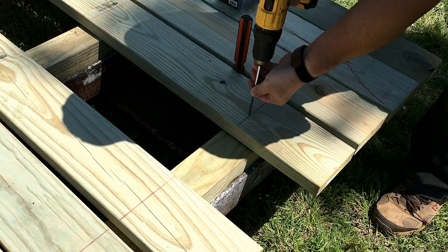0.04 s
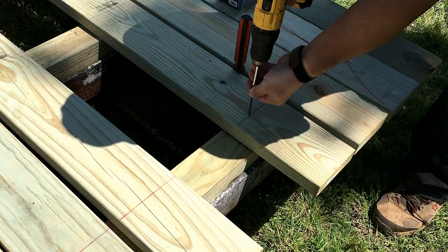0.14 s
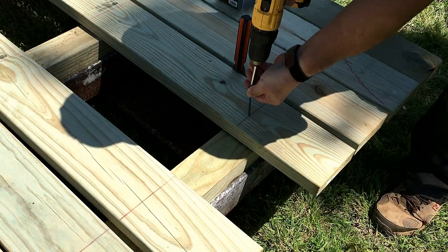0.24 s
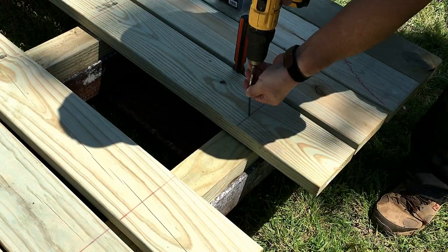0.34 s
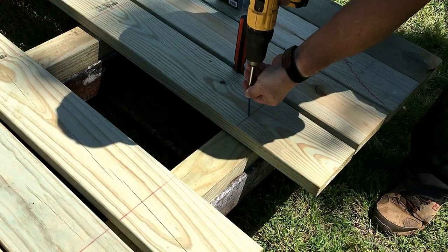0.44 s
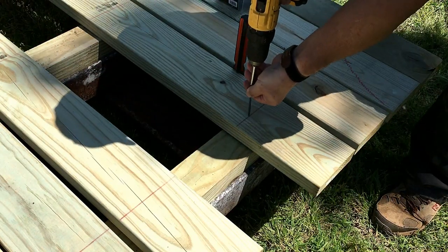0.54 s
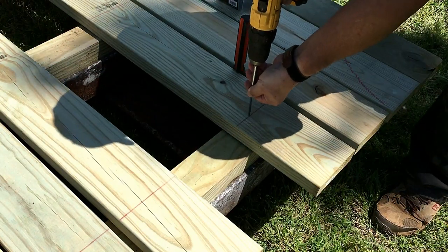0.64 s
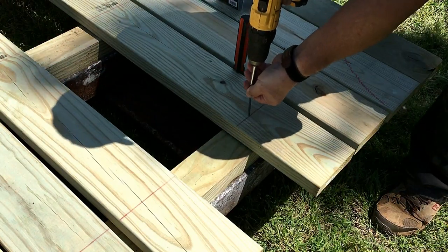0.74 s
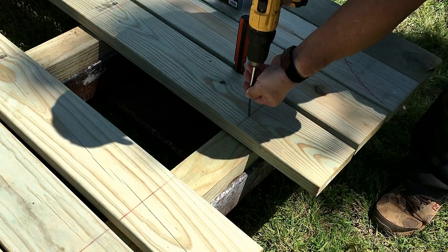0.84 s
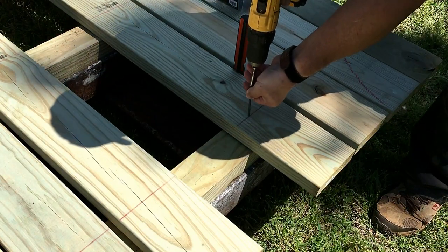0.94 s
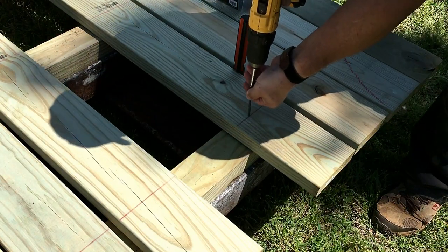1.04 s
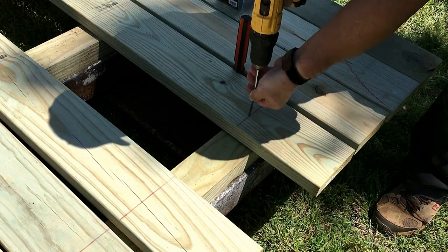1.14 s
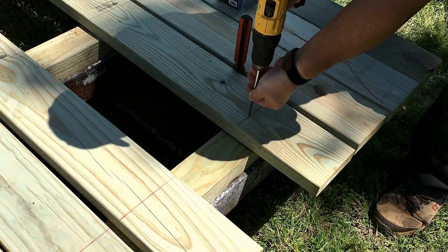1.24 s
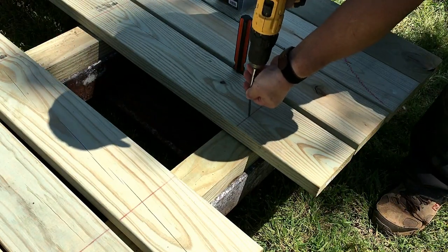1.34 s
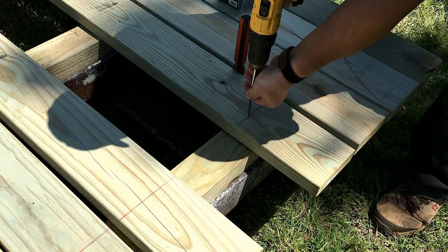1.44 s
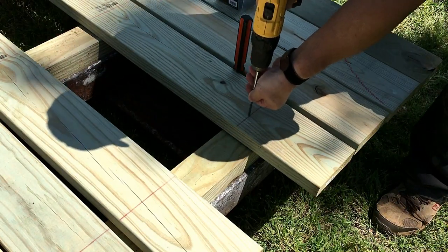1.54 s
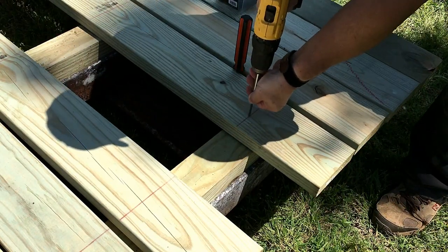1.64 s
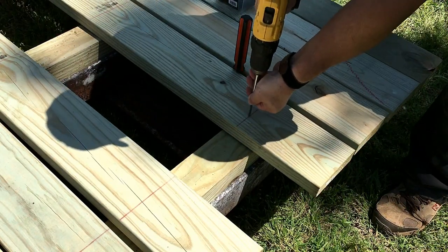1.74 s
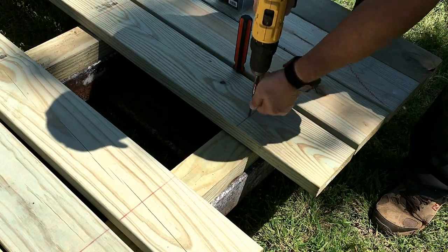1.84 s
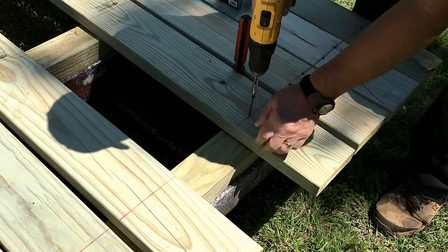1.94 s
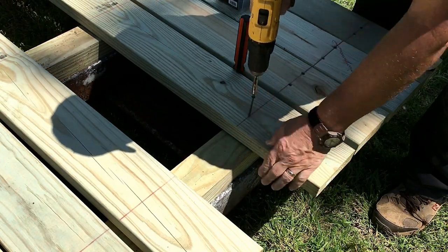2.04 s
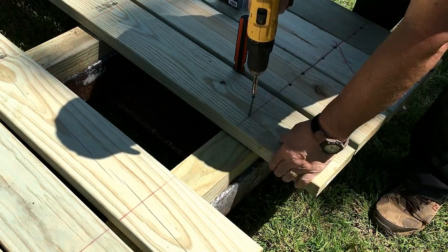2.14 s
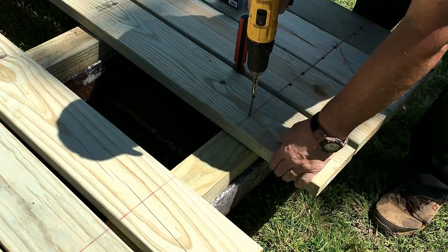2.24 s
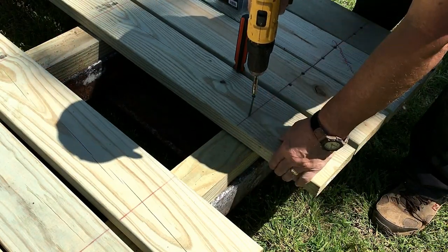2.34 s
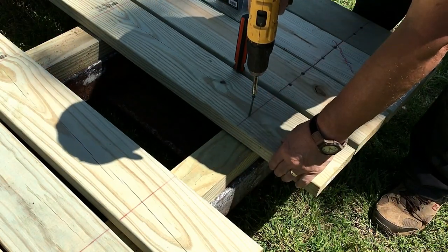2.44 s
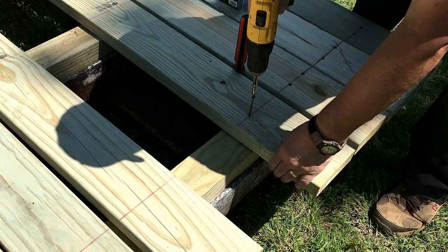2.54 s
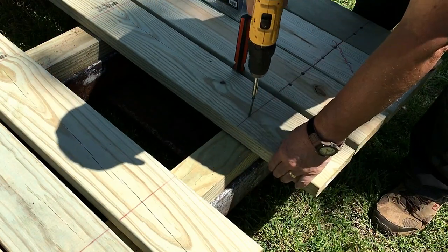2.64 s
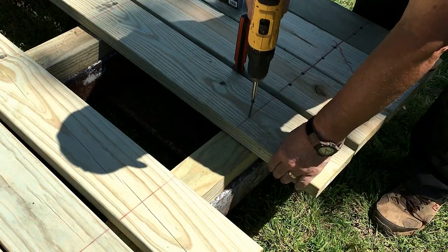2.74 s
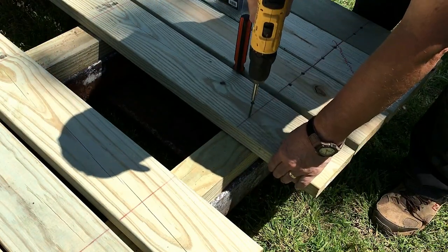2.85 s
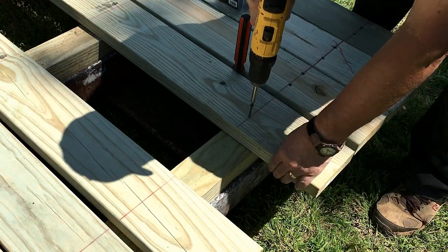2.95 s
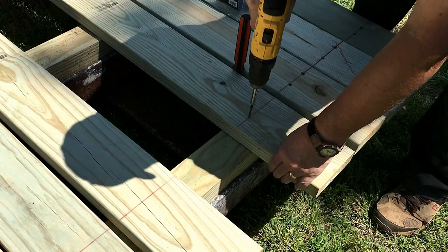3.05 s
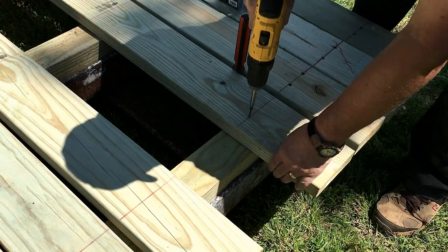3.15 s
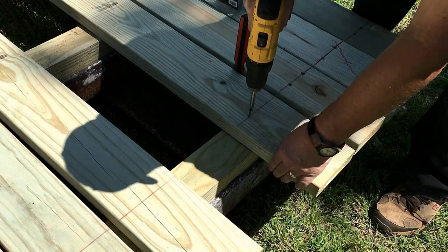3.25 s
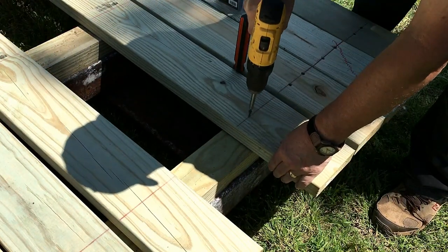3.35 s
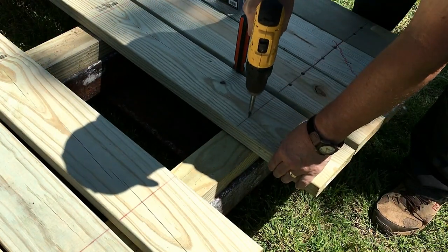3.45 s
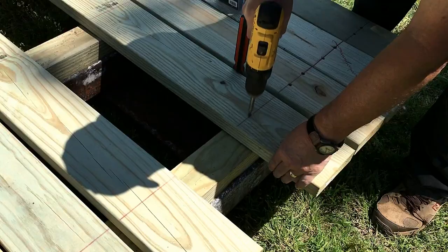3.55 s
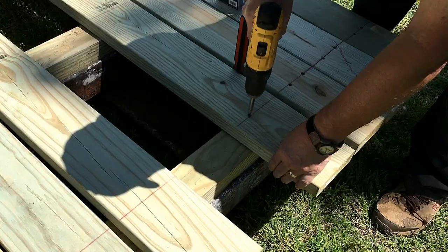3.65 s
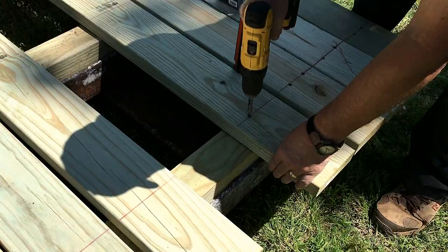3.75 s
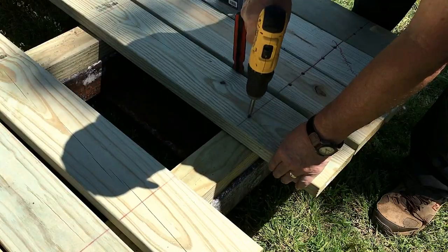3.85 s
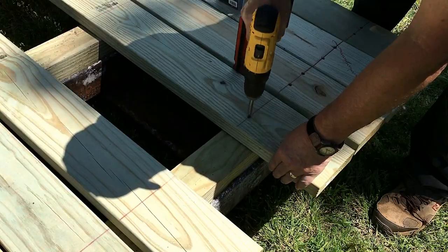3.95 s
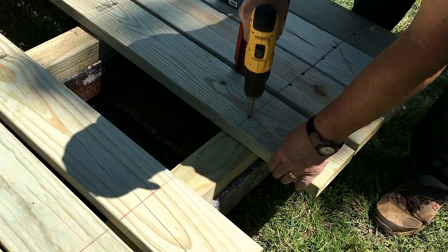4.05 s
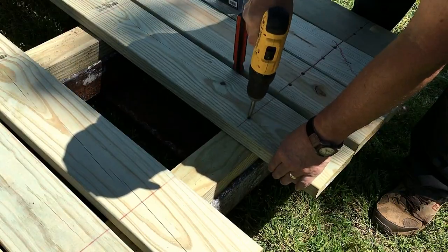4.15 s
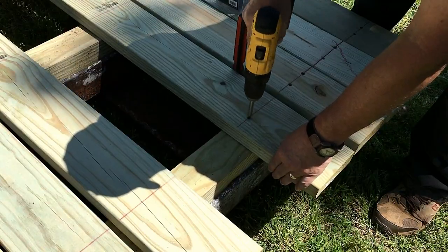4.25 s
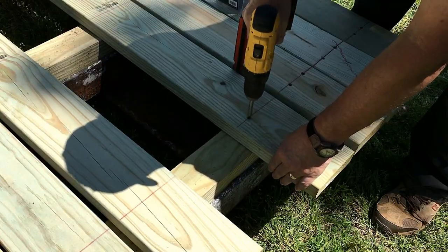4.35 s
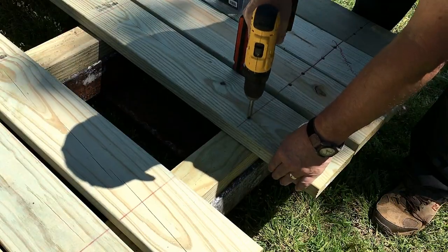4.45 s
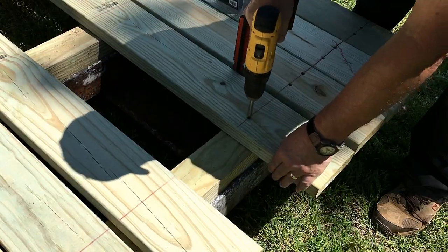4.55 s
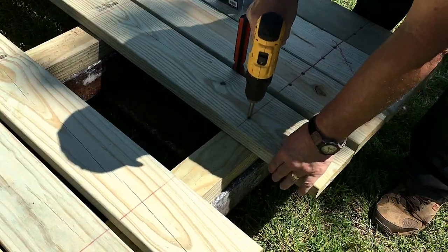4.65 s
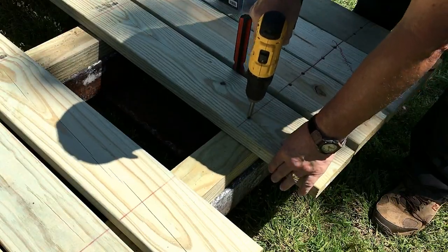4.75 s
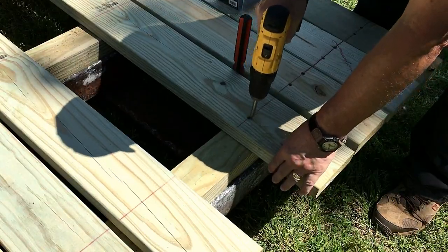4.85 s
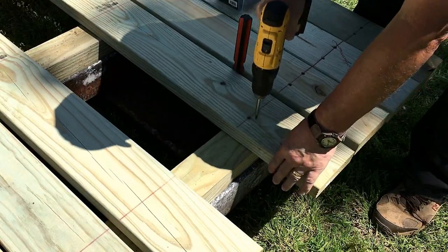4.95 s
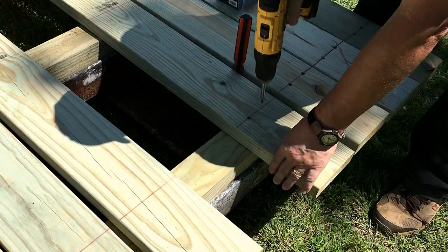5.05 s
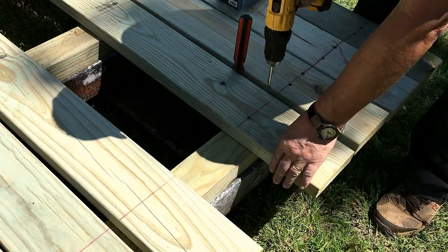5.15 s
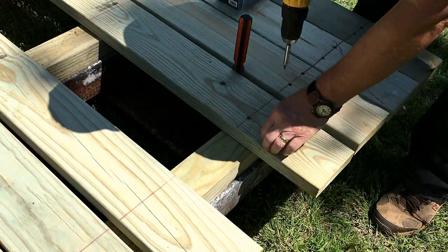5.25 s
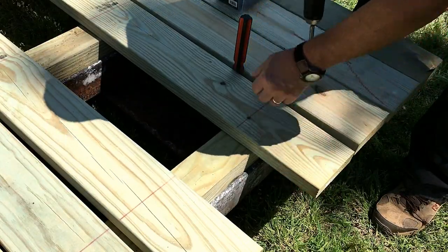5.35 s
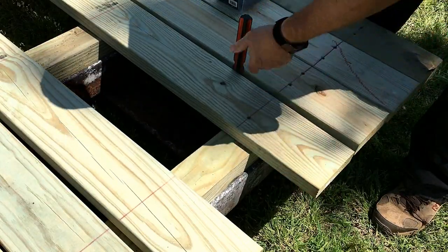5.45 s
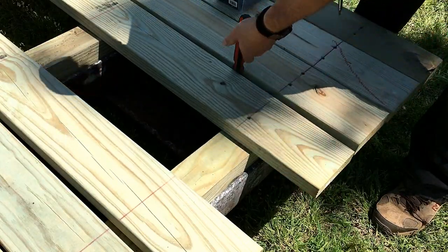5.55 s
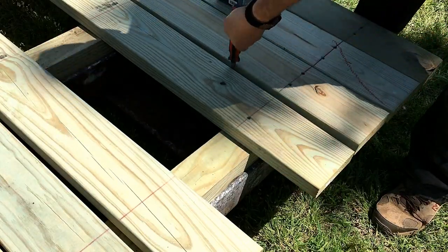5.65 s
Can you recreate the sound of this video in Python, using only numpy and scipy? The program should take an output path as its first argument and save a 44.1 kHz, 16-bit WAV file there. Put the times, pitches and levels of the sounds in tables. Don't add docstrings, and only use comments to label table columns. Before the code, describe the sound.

Close outdoors, a cordless drill starts with a thin electronic buzz and a slowly rising whine, then drops into a rough growl as the screw bites. After a pause and a light knock comes a faster, louder, harsher run, then two very short bursts among wooden knocks. A last clack follows. Faint birds and soft distant engine wash lie behind. One near microphone, almost no echo.

```python
import sys
import numpy as np
from scipy import signal
from scipy.fft import rfft, irfft, next_fast_len
from scipy.io import wavfile
from scipy.ndimage import uniform_filter1d

SR = 44100
rng = np.random.default_rng(int(sys.argv[2]) if len(sys.argv) > 2 else 0)


def invert_db(level):
    return 10 ** (np.asarray(level, dtype=float) / 20)


def generate_wav(sig):
    pcm = np.round(np.clip(np.atleast_2d(sig).T, -1, 1) * 32767).astype(np.int16)
    wavfile.write(sys.argv[1], SR, pcm)


N = 251323
TIME = np.arange(N) / SR


def evened(x):
    return x / np.sqrt(np.mean(x ** 2) + 1e-20)


def read(points, hz):
    f, value = np.transpose(points)
    return np.interp(np.log(hz + 1), np.log(f + 1), value)


def add(mix, start_s, sound):
    part = mix[round(start_s * SR):][:len(sound)]
    part += sound[:len(part)]


def shaped(x, gain):
    size = next_fast_len(len(x) + 4096)
    return irfft(rfft(x, size) * gain(np.fft.rfftfreq(size, 1 / SR)), size)[:len(x)]


def wander(size, hz):
    return evened(shaped(rng.standard_normal(size), lambda f: 1 / (1 + (f / hz) ** 4)))


# start_s, load (0 free to 1 full)
LOAD = [
    (1.5, 0),
    (1.62, .7),
    (1.9, .7),
    (2.7, 1),
]
# time_s, whine_hz (12 times the shaft speed)
SPEED = [
    [(.19, 2270), (.66, 2470), (.888, 2529), (1.086, 2612), (1.33, 2738), (1.47, 2782), (1.575, 2706),
     (1.73, 2257), (1.89, 1870)],
    [(2.67, 3900), (2.84, 3905), (2.94, 3806), (3.02, 3700), (3.1, 3614), (3.18, 3567), (3.28, 3559),
     (3.41, 3443), (3.655, 3290)],
    [(3.822, 1500), (3.84, 1960), (3.859, 2720), (3.869, 2900), (3.89, 2900), (3.941, 2710)],
    [(4.103, 2700), (4.2, 2700), (4.216, 2620)],
]
# speed at the pull_hz, spin_up_s, brake_s
MOTOR = [
    (930, .11, .08),
    (20, .05, .085),
    (900, .026, .047),
    (800, .055, .04),
]
# hiss_db, orders_db, whine_db
TONE = [
    (2, -1.5, 2.5),
    (-0.5, 3.5, 0.5),
    (-5, 4.5, 0),
    (-6, 5, -0.5),
]
# time_s, motor_level_db, push of the hand on the board_db
EFFORT = [
    [(.19, -45, -0.5), (.42, -44, 2), (1.08, -42.5, 4), (1.27, -41.5, 1), (1.53, -40.5, 2), (1.6, -39, 3),
     (1.89, -41, 2)],
    [(2.67, -36, 9), (2.8, -32.5, 2.5), (3.04, -32.5, 4), (3.2, -33, 1.5), (3.655, -32.5, 0.5)],
    [(3.815, -30, 0), (3.932, -30, -3.5)],
    [(4.095, -28, 5.5), (4.207, -29.5, -4)],
]
FADE_S = [0.076, 0.086, 0.061, .051]
SPIN_DB = [37, 10.5, 17.5]
BRAKE_DB = [-36, -45, -96]


def trigger_pull(load, speed, motor, tone, effort, fade_s):
    stall_hz, surge_db = 500, 4
    engage_db, engage_s = -6.5, 0.014
    brake_curve = 2.8
    on, off = speed[0][0], speed[-1][0]
    start_hz, spin_s, brake_s = motor
    hiss_db, orders_db, whine_db = tone
    since_pull = np.maximum(TIME - on, 0)
    since_release = np.maximum(TIME - off, 0)

    goal_hz = np.interp(TIME, *np.transpose(speed))
    reached = 1 - (1 - start_hz / goal_hz) * np.exp(-since_pull / spin_s)
    driven_hz = goal_hz * reached
    hz = driven_hz + (stall_hz - driven_hz) * np.minimum(since_release / brake_s, 1)

    s, *columns = np.transpose(effort)
    motor_db, push_db = (np.interp(TIME, s, c) for c in columns)
    levels = motor_db + np.outer(SPIN_DB, np.log10(reached))
    levels = levels + np.outer(BRAKE_DB, (since_release / fade_s) ** brake_curve)
    levels = levels + engage_db * np.exp(-since_pull / engage_s)
    levels = np.maximum(levels + [push_db, 0 * TIME, hiss_db + 0 * TIME], -110)
    surge = surge_db * load * np.minimum(5 * (1 - reached), 1)
    return np.array([hz, *levels, orders_db + 0 * TIME, whine_db + surge])


def orders(table, turns, load, flutter_db):
    out = np.zeros(N)
    hop = 256
    steps = np.arange(N // hop + 2)
    step_load = np.interp(steps * hop, np.arange(N), load)
    for order, light_db, heavy_db in table:
        flutter = invert_db(flutter_db * wander(len(steps), 5200))
        height = flutter * invert_db(light_db + step_load * (heavy_db - light_db))
        out += np.repeat(height, hop)[:N] * np.sin(2 * np.pi * (order * turns + rng.random()))
    return out


# pitch_hz, level over the casing noise_db
WHINE_PATH = [(1100, -16), (1720, -3), (1950, -4.5), (2300, 4.5), (2590, -8), (2720, 0), (3350, 2.5),
              (3680, 8.5), (3830, -6)]


def slot_whine(speed, turns, load, whine_db):
    sag_db, sag_hz_per_s = -1.5, 2600
    muffle_db = -11
    slope = np.gradient(uniform_filter1d(speed, size=2000)) * SR
    sagging = np.clip(-slope / sag_hz_per_s, 0, 1)
    level_db = sagging * (sag_db + 2 * wander(N, 60))
    level_db += read(WHINE_PATH, abs(speed)) + load * (whine_db + muffle_db)
    level_db += (1 + .5 * load) * wander(N, 45)
    return np.sqrt(2) * invert_db(level_db) * np.sin(2 * np.pi * 12 * turns)


# centre_hz, width_hz, lift_db
CASING_RINGS = [(5200, 350, -4), (6150, 300, 8), (6750, 300, -9), (7600, 300, 4), (8500, 500, 2),
                (9900, 600, 3), (11500, 350, -4), (12500, 600, 6)]
# pitch_hz, level_db (per Hz)
CASING_LIGHT = [(530, -76), (900, -17), (1070, -17.5), (1690, -9.5), (1910, -12), (3690, -12), (3830, -12),
                (4020, -10), (4170, -13.5), (5450, -10), (6860, -18), (7700, -13), (9900, -14),
                (11500, -18.5), (12800, -16.5), (13500, -18), (14300, -15), (15000, -19.5), (15780, -18),
                (15900, -60)]
# pitch_hz, level_db (per Hz)
CASING_HEAVY = [(530, -12.5), (900, -3), (1110, -1), (1220, 1.5), (1670, -2.5), (2470, 1), (2930, -5.5),
                (3150, -1), (3920, 1), (7000, -4), (8800, 1.5), (10400, -9), (11600, -5), (15780, -6.5),
                (15900, -50)]


def casing_and_hiss(speed, turns, carrier, load, tones):
    throb_db = 1.7 * np.cos(2 * np.pi * turns) + 1.0 * np.cos(2 * np.pi * carrier)
    throb_db += 0.27 * wander(N, 48)
    noise = evened(invert_db(throb_db) * rng.standard_normal(N))

    def rings(f):
        return invert_db(sum(db / (1 + ((f - hz) / w) ** 2) for hz, w, db in CASING_RINGS) - 1.5)

    drive = noise + shaped(tones, rings)
    light = shaped(drive, lambda f: invert_db(read(CASING_LIGHT, f)))
    heavy = shaped(drive, lambda f: invert_db(read(CASING_HEAVY, f)))

    def low(f):
        return 1 / (1 + (f / 4000) ** 4)

    def blend(split):
        return (1 - load) * evened(shaped(light, split)) + load * evened(shaped(heavy, split))

    casing = blend(low)
    hiss = blend(lambda f: 1 - low(f))
    top = shaped(hiss, lambda f: 1 / (1 + (8500 / (f + 1)) ** 6))
    top_gain = invert_db(38 * np.log10(np.clip(speed / 1730, .2, 1)))
    return casing, hiss + top * (top_gain - 1)


# centre_hz, width_hz, level_db
BOARD = [(186, 310, -17.5), (244.5, 68, 1), (321, 92, -4.5), (429.7, 31.5, 0.5), (571, 42, 2),
         (722, 74, -3), (795, 130, -13.5), (936, 47, -9.5), (995, 39, -8.5), (1097, 41, -6.5)]


def board_growl(second, load, teeth):
    bite_db = 1.4 * np.cos(2 * np.pi * second) + 1.0 * wander(N, 4.3)
    jolts = invert_db(bite_db) * rng.standard_normal(N)

    def modes(f):
        ring = sum((-1) ** k * invert_db(db) / (1 + 2j * (f - hz) / w) for k, (hz, w, db) in enumerate(BOARD))
        return ring * f ** 2 / (f ** 2 + 170 ** 2) / (1 + (f / 1400) ** 4)

    board = evened(shaped(evened(jolts) + invert_db(.5) * teeth, modes))
    upper = invert_db(-8) * evened(shaped(board, lambda f: 1 / (1 + ((f - 880) / 210) ** 4)))
    middle = .35 * shaped(board, lambda f: 1 / (1 + ((f - 560) / 70) ** 2))
    return board + load ** 2 * (upper - middle)


# start_s, length_s, order (cycles per shaft turn), level_db
SQUEALS = [(0.2096, 0.03, 25, -41.5), (1.57, 0.12, 26.4, -41), (1.58, 0.19, 25.2, -44),
           (1.62, 0.29, 12, -45.5), (3.0, 0.62, 12, -45), (1.855, 0.071, 38.8, -41), (3.66, .045, 25, -48),
           (1.6, 0.38, 7.8, -48), (3.872, .06, 50, -43), (3.83, 0.038, 12, -34), (3.862, .03, 12, -32),
           (3.942, 0.026, 10, -29), (3.822, 0.029, 24, -34), (3.85, 0.055, 24, -38),
           (3.925, .035, 18, -36.5), (3.843, 0.024, 36, -37.5), (4.117, 0.058, 12, -28.5),
           (4.214, .03, 12, -36), (4.12, .03, 36, -37), (4.155, .025, 36, -37), (4.21, .02, 21, -38),
           (4.175, .045, 6.9, -34), (2.745, 0.056, 12, -38), (1.76, 0.13, 38.8, -46)]


def squeals(turns):
    out = np.zeros(N)
    for s, length, order, db in SQUEALS:
        part = turns[round(s * SR):round((s + length) * SR)]
        if length < .08:
            rough = .9 + .45 * wander(len(part), 150)
        else:
            rough = .3 + wander(len(part), 260)
        tone = np.sqrt(2) * np.sin(2 * np.pi * order * part)
        add(out, s, invert_db(db) * rough * np.hanning(len(part)) * tone)
    return out


# order (cycles per shaft turn), light_load_db, heavy_load_db (over the noise)
GEAR_ORDERS = [(0.82, -40, -18.5), (1.14, -23, -21), (1.38, -29, -25), (1.52, -26, -20), (1.9, -25, -20),
               (2.27, -25, -18), (2.63, -20, -23), (3.04, -25, -31), (3.39, -26, -26), (5.25, -31, -23),
               (7.88, -33, -24), (8.13, -21, -23), (8.41, -31, -25), (8.74, -37, -23), (10.64, -27, -21),
               (10.9, -24, -23), (12.82, -27, -21), (13.37, -20, -22), (13.92, -38, -25), (16.2, -28, -25),
               (17.13, -31, -24), (21.54, -40, -20), (25.9, -35, -23), (26.18, -24, -25)]
# order (cycles per shaft turn), light_load_db, heavy_load_db (over the noise)
SHAFT_ORDERS = [(15, -19, -21), (20, -12, -24), (24, -28, -21), (25, -40, -26), (28, -24, -37),
                (30, -17, -20), (31, -23, -26), (33, -13, -25), (35, -15, -21), (36, -21, -25),
                (37, -20, -30), (38, -18, -28), (39, -23, -25), (40, -18, -28), (41, -22, -34),
                (42, -22, -35), (43, -20, -30), (44, -21, -32), (45, -13, -24), (47, -14, -40),
                (48, -15, -30), (49, -18, -32), (50, -13, -24), (53, -18, -32), (55, -18, -27),
                (58, -20, -36), (60, -17, -34), (62, -21, -30), (63, -19, -38), (64, -21, -38),
                (65, -20, -34), (67, -20, -38), (70, -19, -37), (74, -19, -38)]


def drill():
    load = np.interp(TIME, *np.transpose(LOAD))
    state = np.full((6, N), -110.)
    for run in zip(SPEED, MOTOR, TONE, EFFORT, FADE_S):
        pull_s = run[0][0][0]
        state = np.where(TIME >= pull_s, trigger_pull(load, *run), state)
    speed, board_db, casing_db, hiss_db, torque_db, whine_db = uniform_filter1d(state, size=300)

    turns = np.cumsum(uniform_filter1d(speed, size=600)) / SR / 12
    turns = turns + (.002 + .005 * load) * wander(N, 40)
    carrier, second = turns * 15 / 55, turns * .379
    teeth = orders(GEAR_ORDERS, turns, load, 3.5)
    bars = invert_db(torque_db + 1.5) * orders(SHAFT_ORDERS, turns, load, 1.8)

    casing, hiss = casing_and_hiss(speed, turns, carrier, load, invert_db(torque_db) * teeth + bars)
    board = board_growl(second, load, teeth)
    whine = slot_whine(speed, turns, load, whine_db)
    body = invert_db(board_db) * board + invert_db(casing_db) * (invert_db(0.04) * casing + whine)
    return body + invert_db(hiss_db) * hiss + squeals(turns)


# start_s, length_s, level_db, pitch_hz
THRUM = [
    (1.551, 0.49, -37, 284),
    (3.22, 0.52, -43.5, 163.3),
    (3.853, 0.55, -60, 155),
    (4.1, 0.59, -54, 157),
]


def joist():
    out = np.zeros(N)
    for s, length, db, hz in THRUM:
        u = np.linspace(0, 1, round(length * SR))
        hum = shaped(rng.standard_normal(len(u)), lambda f: 1 / (1 + ((f - hz) / (0.12 * hz)) ** 2))
        add(out, s, invert_db(db) * np.sin(np.pi * u ** 0.71) ** 2 * evened(hum))
    return out


# on_s, off_s, start_db, end_db, overtones_db
CHOPPER = [
    (0.196, 1.225, -32.5, -32.5, -27),
    (1.229, 1.89, -32, -31, -36),
    (1.963, 2.055, -91, -75, -27),
    (2.656, 2.701, -42.5, -36.5, -21.5),
]
CHOPPER_TONES = [2, 3]


def chopper(on, off, on_db, off_db, over_db):
    t = np.arange(on, off, 1 / SR)
    angle = 2 * np.pi * 3922.6 * t
    overtones = sum(np.sin(k * angle) for k in CHOPPER_TONES)
    tone = np.sin(angle) + invert_db(over_db - 60 * (t - on)) * overtones
    level_db = np.linspace(on_db, off_db, len(t)) + .5 * wander(len(t), 23)
    return on, np.sqrt(2) * invert_db(level_db) * tone * signal.windows.tukey(len(t), 120 / len(t))


# start_s, peak_db, pitch_hz, t60_s (time to fall 60 dB)
TICKS = [(0.1257, -49, 5630, 0.013), (.1424, -59, 8500, 0.018), (0.1974, -45, 7700, 0.0077),
         (2.226, -41, 2500, 0.029), (2.655, -55, 3900, 0.0075), (3.7714, -51, 7000, 0.02),
         (3.804, -36.5, 1300, 0.015), (3.818, -42, 8000, 0.029), (4.057, -49, 9500, 0.017),
         (4.09, -39, 1100, 0.022), (4.1, -43, 3500, 0.014), (4.149, -21.5, 1400, 0.02),
         (4.1674, -26, 9000, 0.012), (4.8454, -61, 8500, .02), (4.894, -39.5, 11100, 0.014),
         (4.896, -50, 3780, 0.024), (4.9764, -30.5, 9100, 0.018), (4.977, -39, 3700, .02),
         (4.99, -52, 3200, .015), (5.007, -52, 3000, .015), (5.28, -53, 3020, 0.012),
         (5.6794, -63, 4000, .02)]


def tick(s, db, hz, t60):
    t = np.arange(2000) / SR

    def snap(f):
        bass_cut = f ** 2 / (f ** 2 + min(hz / 2, 1500) ** 2)
        wide = 0.87 / (1 + (f / hz / 3) ** 4)
        ring = 1 / (1 + ((f - hz) / 900) ** 2)
        return bass_cut * (wide + ring)

    burst = evened(shaped(rng.standard_normal(len(t)), snap))
    return s, 0.83 * invert_db(db - 60 * t / t60) * burst * np.minimum(t / 0.00015, 1)


# start_s, peak_db, centre of the blow_hz, ring_factor, joist_thud_db
KNOCKS = [(2.2273, -25.5, 1210, 1.3, -9), (2.681, -29.5, 980, 0.87, 0), (3.695, -30, 250, 1.9, 7),
          (3.958, -26, 270, 1.8, 7), (4.006, -26.5, 330, 2.1, 5), (4.232, -22, 250, 1.44, 7),
          (4.168, -17.5, 805, 0.97, -0.5), (4.2775, -21, 1040, 0.97, -3.5), (4.977, -18.5, 990, 1.33, 2),
          (5.007, -30, 900, 0.58, 10), (5.627, -69, 500, .9, -5), (5.686, -39, 400, 0.65, 12)]
# pitch_hz, level_db, t60_s (time to fall 60 dB)
WOOD = [(204.8, 5, 0.38), (257.4, 23.5, 0.047), (325.2, 3.5, 0.22), (429, 16.5, 0.092), (605, 16, 0.083),
        (738, 12, 0.086), (757, 11.5, 0.078), (934, 10.5, 0.083), (1126, 15.5, 0.052), (1340, 17.5, 0.028),
        (1564, 3, 0.081), (1790, 7.5, 0.045), (2080, 11, 0.039), (2500, 14, 0.027)]


def knock(s, db, centre_hz, ring, thud_db):
    t = np.arange(9000) / SR
    sound = np.zeros(len(t))
    for hz, mode_db, t60 in WOOD:
        reach_db = max(-8 * np.log2(hz / centre_hz) ** 2, thud_db - 40 * (hz > 400))
        envelope = invert_db(mode_db + reach_db - 60 * t / (t60 * ring))
        envelope *= 1 - np.exp(-(t * hz / 0.97) ** 2)
        grain = 1 + 0.57 * wander(len(t), 0.1 * hz)
        mode_hz = hz * rng.uniform(0.95, 1.03)
        sound += envelope * grain * np.sin(2 * np.pi * (mode_hz * t + rng.random()))
    return s, invert_db(db) * sound / abs(sound).max()


# start_s, length_s, top_hz, level_db
HIGH_CALLS = [(-.04, 0.076, 9560, -67), (1.978, 0.09, 9430, -67), (2.39, 0.104, 9431, -67),
              (3.71, 0.09, 9420, -71), (3.978, 0.12, 9500, -70), (5.396, 0.092, 9520, -69.5)]
ARCH_CALLS = [(4.87, .11, 7720, -56)]
LOW_CALLS = [(4.431, .11, 2440, -70), (4.68, 0.15, 2440, -67.5)]
SQUEAKS = [(5.09, .03, 3000, -71), (5.12, .04, 4300, -70), (5.15, .03, 5300, -73)]
CHIRPS = [(4.25, .085, 7540, -64)]
# top_pitch_share, pitch_drop_hz at the ends, top_level_share, start_db, end_db
HIGH = (.4, 70, .4, -6, -7)
ARCH = (.64, 1150, .84, -22, -4)
LOW = (.7, 170, .6, -6, -6)
SQUEAK = (.95, 250, .9, -8, -1)
CHIRP = (.7, 400, .7, -4, -8)


def bird(shape, start, length, top_hz, db):
    top, drop_hz, loud, start_db, end_db = shape
    t = np.arange(max(start, 0), start + length, 1 / SR)
    u = (t - start) / length
    drop = np.where(u < top, abs(1 - u / top) ** 1.3, abs((u - top) / (1 - top)) ** 2.13)
    hz = top_hz - drop_hz * drop + 25 * wander(len(t), 60)
    tone = np.sin(2 * np.pi * np.cumsum(hz) / SR)
    level_db = db + np.interp(u, [0, loud, 1], [start_db, 0, end_db]) + 2.0 * wander(len(t), 50)
    return t[0], np.sqrt(2) * invert_db(level_db) * tone * signal.windows.tukey(len(t), .15)


# pitch_hz, level_db (per Hz)
AIR = [(12, -36.5), (20, -3), (58, -5), (200, -13.5), (237, -16), (273, -21), (452, -35), (1170, -29.5),
       (2180, -39.5), (2370, -39), (2810, -43), (7710, -52), (9660, -49.5), (10500, -56), (16500, -49)]
# time_s, level_db
ROAD = [(0, 6.5), (2.0, 6), (2.3, 5.5), (3.75, 11), (4.5, 5), (5.7, 2)]
# centre_s, width_s, level_db
ENGINES = [
    (.15, 0.23, 7.5),
    (1.1, 0.16, 12.5),
    (1.7, 0.035, 9),
    (2.65, 0.094, 13.5),
    (3.1, 0.081, 5),
    (4.85, 0.59, 7.5),
]


def air():
    frames, hz = N // 256 + 5, np.fft.rfftfreq(1024, 1 / SR)[:, None]
    t = np.arange(frames) * 256 / SR
    a, b, patches = rng.standard_normal((frames, 513, 3)).T
    patches = evened(uniform_filter1d(uniform_filter1d(patches, 10, 0), 14, 1))
    rumble_db = 2 * wander(frames, 850)
    rumble_db += sum(db * np.exp(-((t - s) / w) ** 2) for s, w, db in ENGINES)
    swell = (rumble_db - rumble_db.mean()) / (1 + (hz / 110) ** 4) + .5 * wander(frames, 870)
    road = np.interp(t, *np.transpose(ROAD)) / (1 + np.log2(hz / 1000 + .01) ** 2)
    spectra = (a + 1j * b) * invert_db(read(AIR, hz) + 0.77 * patches + swell + road)
    wash = evened(signal.istft(spectra, nperseg=1024, noverlap=768)[1][:N])
    return invert_db(-47) * shaped(wash, lambda f: f ** 4 / (f ** 4 + 43 ** 4) / (1 + (f / 13500) ** 8))


def echoes(t60, start):
    t = np.arange(round(t60 * SR)) / SR
    hits = rng.choice([-1., 1.], len(t)) * (rng.random(len(t)) < .05)
    taps = hits * invert_db(-60 * t / t60) * (t > start)
    return taps / np.linalg.norm(taps)


def scene():
    work, birds = drill() + joist(), np.zeros(N)
    for source, table in ((chopper, CHOPPER), (tick, TICKS), (knock, KNOCKS)):
        for row in table:
            add(work, *source(*row))
    songs = ((HIGH, HIGH_CALLS), (ARCH, ARCH_CALLS), (LOW, LOW_CALLS), (SQUEAK, SQUEAKS), (CHIRP, CHIRPS))
    for shape, calls in songs:
        for row in calls:
            add(birds, *bird(shape, *row))
    yard = invert_db(-28.5) * signal.oaconvolve(work, echoes(0.52, 0.022))[:N]
    trees = invert_db(-8) * signal.oaconvolve(birds, echoes(0.4, .03))[:N]
    mono = work + yard + birds + trees + air()
    return np.array([mono, mono])


def band_limit(x):
    return signal.sosfilt(signal.butter(12, 16620, fs=SR, output="sos"), x)


def record(dry):
    heard = np.array([shaped(c, lambda f: 1 / (1 + (f / 15850) ** 200)) for c in dry])
    return band_limit(heard)


dry = scene()
out = record(dry)
generate_wav(out)
```